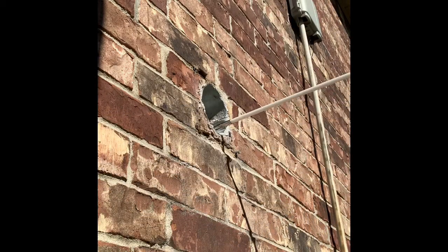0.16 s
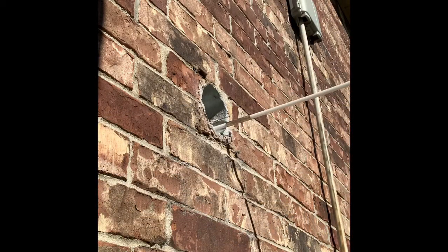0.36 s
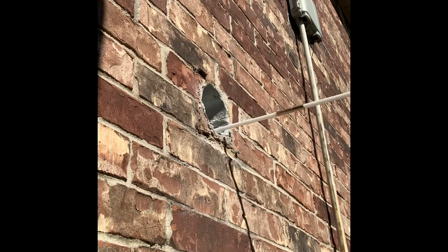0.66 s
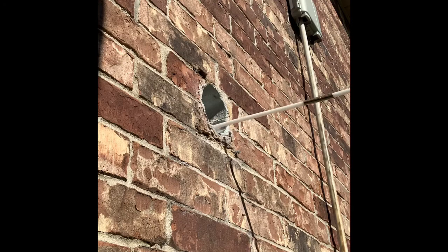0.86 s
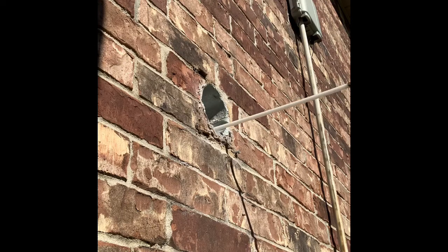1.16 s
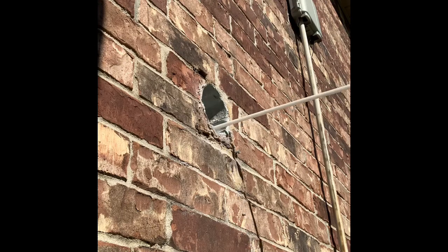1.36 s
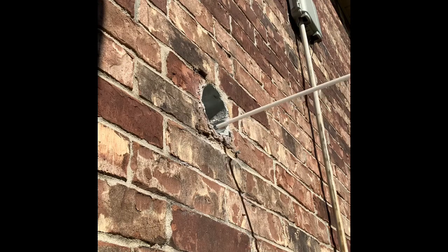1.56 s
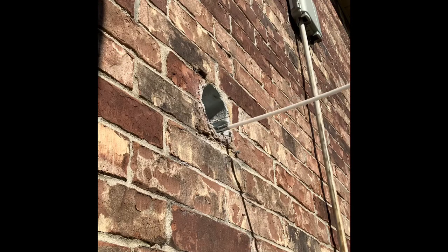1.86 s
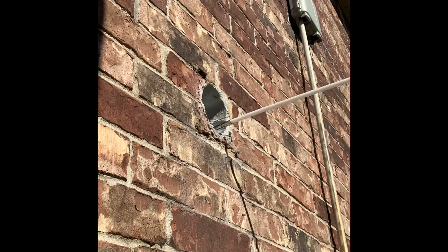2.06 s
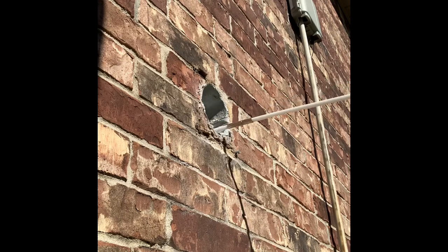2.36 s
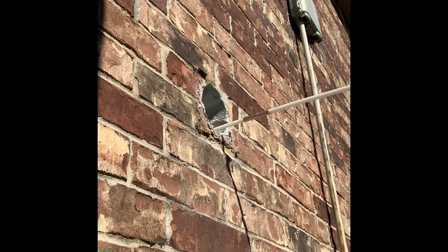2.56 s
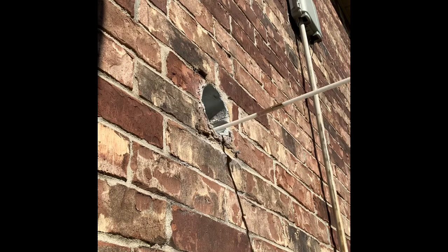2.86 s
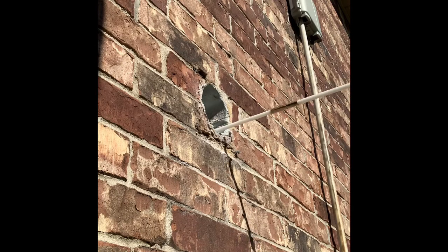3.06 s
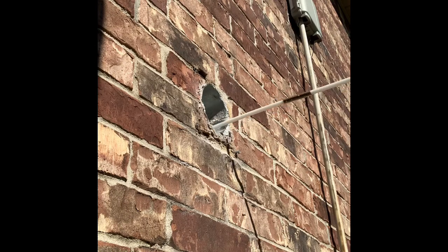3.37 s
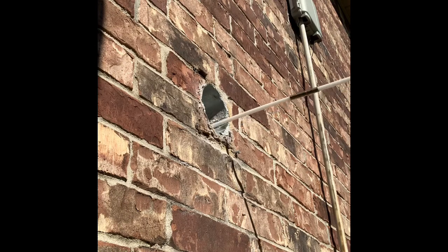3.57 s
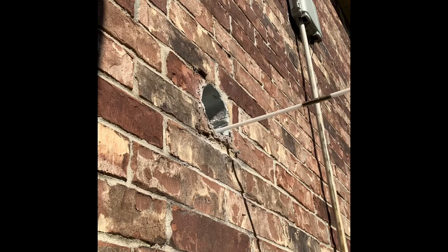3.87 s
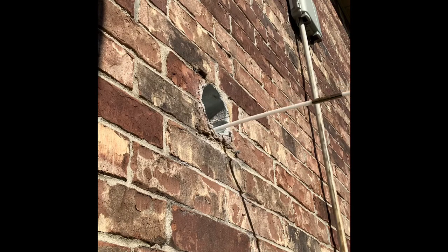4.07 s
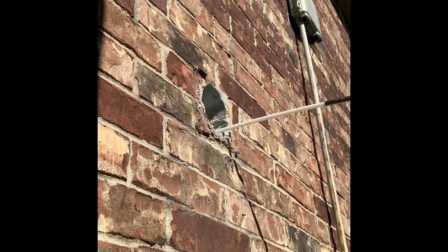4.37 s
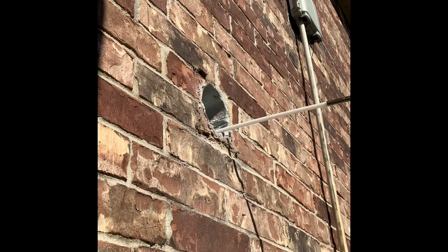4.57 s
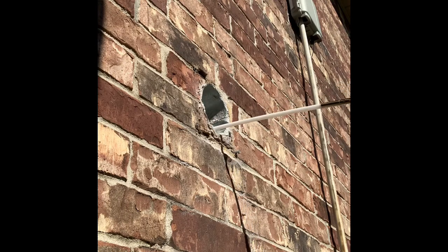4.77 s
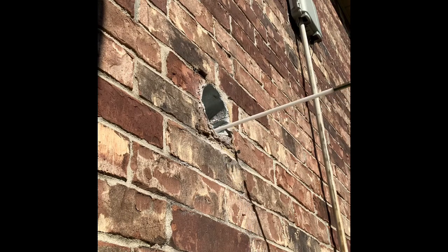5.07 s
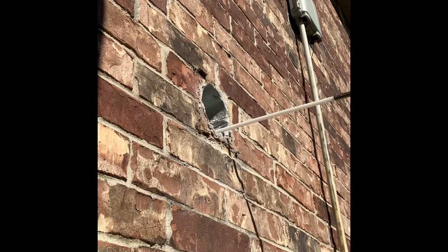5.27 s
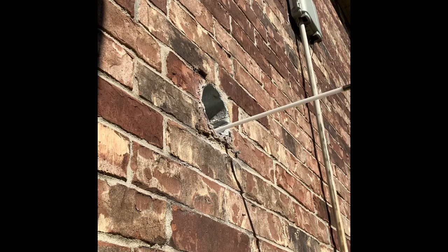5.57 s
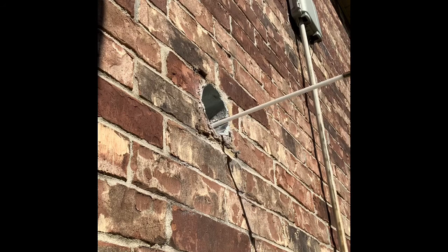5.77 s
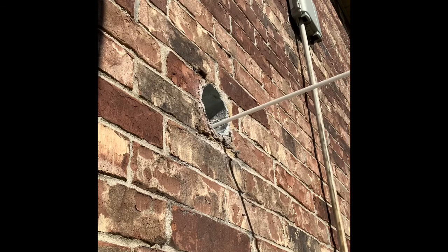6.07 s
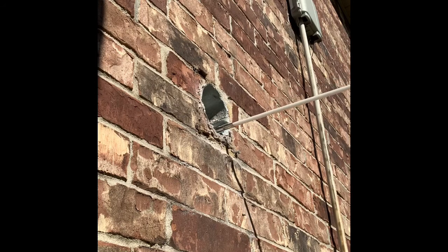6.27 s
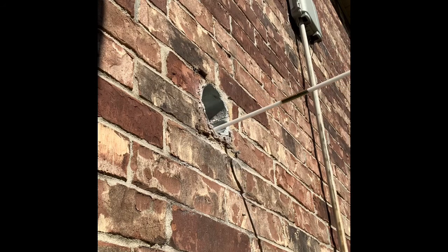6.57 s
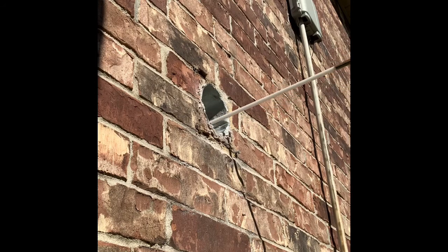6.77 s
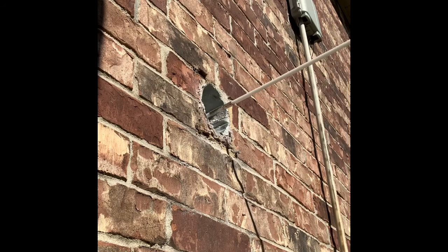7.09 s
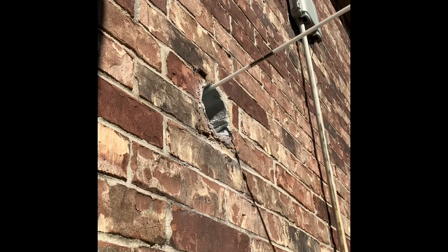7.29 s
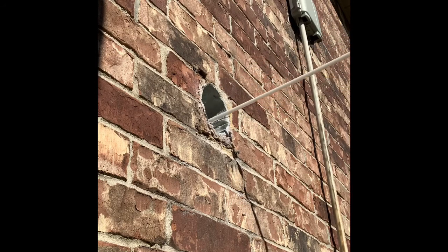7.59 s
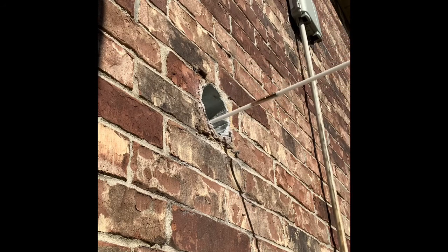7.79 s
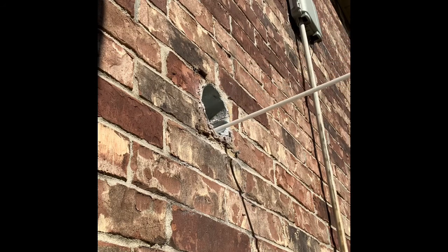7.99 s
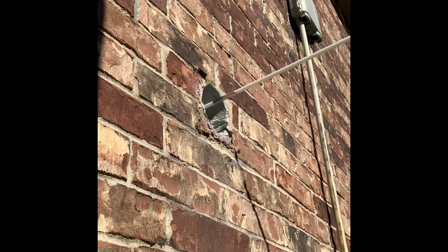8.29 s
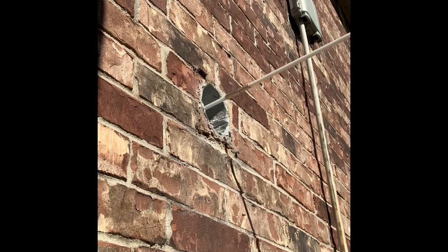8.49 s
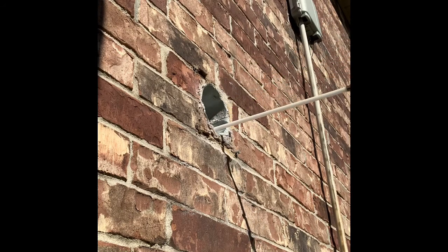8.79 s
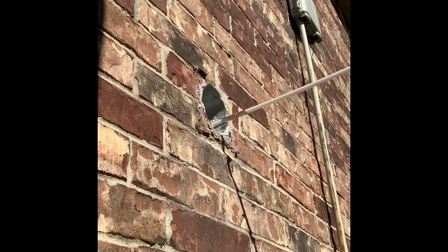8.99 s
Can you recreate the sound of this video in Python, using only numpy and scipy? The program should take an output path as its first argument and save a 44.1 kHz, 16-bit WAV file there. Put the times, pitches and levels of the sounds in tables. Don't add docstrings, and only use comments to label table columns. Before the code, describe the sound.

A loud, nasal electric drill runs first, pulsing roughly eighteen times a second, with irregular metal slaps and taps from the rod it spins in a wall duct. It slows, growls lower and chattery, then dies. A few ringing knocks follow, then an open-air hush: falling bird whistles, later buzzy trills, faint insects, low traffic, light rim scraping and small knocks. A final harder knock comes with rustling cloth. Near stereo pickup, slight brick-wall scatter.

```python
import sys
import numpy as np
from scipy import signal
from scipy.fft import rfft, irfft
from scipy.io import wavfile

SR = 44100
rng = np.random.default_rng(int(sys.argv[2]) if len(sys.argv) > 2 else 0)


def wav_out(sig):
    wavfile.write(sys.argv[1], SR, np.round(np.clip(np.atleast_2d(sig).T, -1, 1) * 32767).astype(np.int16))


def ratio_of_db(decibels):
    return 10 ** (np.asarray(decibels, float) / 20)


N = 403074
T = np.arange(N) / SR
F = np.fft.rfftfreq(N, 1 / SR) + 1


def curve(table, col):
    rows = np.array(table, float)
    return np.interp(T, rows[:, 0], rows[:, col])


def unit(x):
    return x / np.std(x)


def colour(x, points):
    hz, db = np.transpose(points)
    return irfft(rfft(x) * ratio_of_db(np.interp(np.log(F), np.log(hz), db)), N)


def noise():
    return rng.standard_normal(N)


def walk(rate_hz):
    return unit(irfft(rfft(noise()) * np.exp(-(F / rate_hz) ** 2), N))


def hump(hz, width_hz):
    return unit(irfft(rfft(noise()) * np.exp(-((F - hz) / width_hz) ** 2), N))


def flutter(phase, steady, rate_hz):
    loose = walk(rate_hz) * np.sin(phase) + walk(rate_hz) * np.cos(phase)
    return steady * np.sin(phase) + 1.08 * loose


def swells(rows):
    out = 0
    for s, rise, fall, db in rows:
        before = np.clip((s - T) / rise, 0, 9) ** 2
        after = np.clip((T - s) / fall, 0, 99)
        out = out + ratio_of_db(db) * np.exp(-before - after)
    return out


def decay(t, t60):
    return np.exp(-np.log(1000) * t / t60)


def add(out, s, x):
    i = int(s * SR)
    out[i:i + len(x)] += x[:N - i]


# (level [dB], speed slope [dB/octave], share of casing turn, steadiness, flutter [1/s])
MESH_ORDERS = [(-41, 0.5, 0.22, 2.6, 25), (-42.5, 10, -0.39, 2.12, 79), (-49.5, 5.5, 1, 0.89, 75)]
# (frequency [Hz], width [Hz], gain [dB])
CASING_MODES = [(470, 85, -4.5), (657, 71, 2.5), (909, 500, 1.5), (1060, 140, 2.5), (1500, 294, 11),
                (1800, 260, 6.5), (2196, 115, 3.5), (2603, 200, 7), (3474, 430, 17.5)]


def whine(hz, mesh, octaves, facing_db, turn):
    out = 0
    for k, (db, db_per_oct, share, steady, rate) in enumerate(MESH_ORDERS, 1):
        power = sum(ratio_of_db(2 * g) / (1 + (2 * (k * hz - f) / w) ** 2) ** 2 for f, w, g in CASING_MODES)
        level_db = db + db_per_oct * octaves + share * facing_db + 2.3 / k + 1.6 * (k - 0.76) * turn
        if k < 3:
            level_db = level_db + curve(THROB_DRIFT, 2 + k)
        line = flutter(2 * np.pi * k * mesh, steady, rate)
        out = out + np.sqrt(power) * ratio_of_db(level_db) / steady * line
    return out


# (multiple of mesh rate, level re rattle [dB], width [Hz], share of casing turn)
WEAK_ORDERS = [(.885, -23, 7, -.1), (4, -15, 150, -.3), (5, -17, 90, 0), (6, -14, 60, .6),
               (7.1, -12, 60, .1), (7.25, -11, 60, .1), (8, -11, 110, -.2)]


def weak_orders(hz, mesh, octaves, facing_db, turn, rattle_db):
    fan_hz, fan_width_hz, fan_db = 8550, 800, -12
    out = 0
    for k, db, width, share in WEAK_ORDERS:
        level_db = rattle_db + db + share * facing_db + 0.55 * turn
        level_db = level_db + (20 if k > 1 else 90) * octaves
        if k > 7:
            level_db = level_db - 0.5 + fan_db * np.minimum(((k * hz - fan_hz) / fan_width_hz) ** 2, 1)
        out = out + ratio_of_db(level_db) * flutter(2 * np.pi * k * mesh, 0.54, width)
    return out


# (frequency [Hz], width [Hz], gain [dB])
SHELL_MODES = [(1000, 94, -2.5), (1520, 140, -2), (1880, 250, -6), (2566, 550, -3), (3478, 89, 3),
               (4040, 500, 1.5), (5650, 850, -10.5), (6600, 330, -15.5), (8850, 500, -10.5)]
# (multiple of mesh rate, level [dB])
SHELL_ORDERS = [(3, -10.5), (4, -8), (5, -11.5), (6, -18.5), (7, -16)]
# (frequency [Hz], width [Hz], level [dB])
LOOSE_PARTS = [(3472, 120, -14), (4210, 220, -12.5)]


def rattle(mesh, turn, rattle_db):
    power = sum(ratio_of_db(2 * db) / (1 + ((F ** 2 - f ** 2) / (F * w)) ** 2) ** 0.78 for f, w, db in SHELL_MODES)
    shell = np.sqrt(power)
    orders = sum(ratio_of_db(db) * flutter(2 * np.pi * k * mesh, .3, 130) for k, db in SHELL_ORDERS)
    out = irfft(rfft(orders) * shell * shell, N) * ratio_of_db(rattle_db + 2.6 * turn)
    teeth = noise() * np.exp(3.8 * np.cos(2 * np.pi * mesh))
    chatter = unit(irfft(rfft(teeth) * shell, N))
    out = out + chatter * ratio_of_db(rattle_db - 6.0 + 3.6 * turn + 2.2 * walk(60))
    buzz = sum(hump(f, w) * ratio_of_db(db) for f, w, db in LOOSE_PARTS)
    return out + buzz * ratio_of_db(rattle_db + 5.15 * turn)


# (frequency [Hz], level [dB])
HISS_SPECTRUM = [(2800, -3.5), (3900, -8.5), (5000, 3.5), (5700, -0.5), (7500, -1.5), (8700, 3),
                 (10000, -1), (12000, -4), (14000, -11.5), (15800, -28.5)]


def motor_hiss(hiss_db, turn):
    hiss = unit(colour(noise(), [(50, -60.5)] + HISS_SPECTRUM))
    return hiss * ratio_of_db(hiss_db - 3.47 + 1.3 * turn + 2.54 * walk(96))


# (frequency [Hz], level [dB])
RUMBLE_SPECTRUM = [(100, -24.5), (150, -5), (200, 0), (320, -8.5), (500, -15.5), (800, -20.5),
                   (1200, -34.5)]


def rod_rumble(rumble_db, jolt_db, turn):
    rumble = unit(colour(noise(), [(20, -45.5)] + RUMBLE_SPECTRUM + [(3000, -48)]))
    return rumble * ratio_of_db(rumble_db + .5 * jolt_db + 1.5 * turn + 2.3 * walk(7.2))


# (time [s], rise [s], fall [s], level [dB])
ROD_WHIPS = [(.4, 0.077, 0.072, -12), (1.2, 0.25, 0.22, -4), (1.65, 0.084, 0.11, -1), (2.2, 0.43, 0.17, -8),
             (3.2, 0.32, 0.077, -2), (4.32, 0.015, 0.035, 5.5)]
# (time [s], rise [s], fall [s], level [dB])
AIR_DRONES = [(.1, 0.084, .1, -34.5), (1.5, 0.034, 0.17, -32.5), (2.3, 0.08, .06, -34)]


def duct_boom(hz):
    whip_hz, whip_width_hz = 603, 57
    speed_db = 4 * np.exp(-((hz - whip_hz) / whip_width_hz) ** 2)
    boom_db = -46 + speed_db + 20 * np.log10(1 + swells(ROD_WHIPS)) + 1.0 * walk(3.3)
    return hump(106, 38.5) * ratio_of_db(boom_db + 3.0) + hump(200, 60) * swells(AIR_DRONES)


# (time [s], gear mesh [Hz], motor effort [dB], casing turned to the phone [dB], rod pressed on duct [dB])
HAND_ON_DRILL = [(0, 1079, -34, -8, -36), (.33, 1074, -31, -11, -40.5), (.55, 1079, -34, -2, -41),
                 (.64, 1142, -32, -14, -41), (1.0, 1159, -33, -10, -40.5), (1.25, 1179, -32, -3, -46.5),
                 (1.45, 1146, -31.5, -5, -34.5), (1.8, 1119, -31, 4.5, -37), (2.1, 1065, -32, 4, -32.5),
                 (2.3, 1059, -36, -1, -33), (2.54, 847, -32.5, 7, -44), (2.68, 753.8, -37.5, 2.5, -44),
                 (3.06, 636.7, -37, -3, -44.5), (3.5, 631.6, -42, -12, -49),
                 (3.88, 641.3, -41.5, 4.5, -42.5), (4.05, 486.5, -53, -8.5, -46),
                 (4.24, 420.2, -56, -1, -49), (4.3, 332.6, -62, 4, -48.5)]
# (time [s], throb lag [turns], throb depth, first
# order [dB], second order [dB])
THROB_DRIFT = [(.1, -0.36, 1.5, 1, 4.5), (.55, -0.17, 1.25, 3.5, 5), (.85, -0.39, 0.97, 0.5, 1.5),
               (1.2, -0.19, 1.86, 1, 1.5), (1.6, -0.55, 0.95, -7, -0.5), (1.85, -0.57, 1.02, 3, 5),
               (2.2, -0.55, 1.8, -0.5, 2.5), (2.45, -0.56, 0.46, 1.5, 3.5), (2.62, -0.57, 0.53, -11.5, 4),
               (2.84, -0.57, 0.53, -4, 4.5), (3.02, -0.64, 0.93, -8, 2), (3.3, -0.85, 1.6, 2.5, 6),
               (3.48, -0.86, 1.2, 3.5, 4.5), (3.62, -0.57, 1.4, -11.5, 2), (3.75, -0.82, 1.6, -14.5, 1.5),
               (3.88, -0.72, 1.8, 2.5, 9), (4.1, -0.89, 0.14, 0.5, 3.5), (4.3, -1, 0.81, -4, 4.5)]


def drill():
    teeth_per_turn, strike_s, slip_turns = 60.5, 3.514, .02
    jolt_s, jolt_lag_s = 0.03, 0.0086
    hz, effort_db, facing_db, rumble_db = (curve(HAND_ON_DRILL, c) for c in range(1, 5))
    octaves = np.log2(hz / 1100)
    mesh = np.cumsum(hz * (1 + .0015 * walk(20.2))) / SR
    turns = (mesh - np.interp(strike_s, T, mesh)) / teeth_per_turn
    angle = 2 * np.pi * (turns + slip_turns * walk(7.1) + curve(THROB_DRIFT, 1))
    turn = np.cos(angle) * curve(THROB_DRIFT, 2)
    mesh = mesh + 0.058 * np.sin(angle)
    jolt_db = sum(db * np.exp(-((T - s - jolt_lag_s) / jolt_s) ** 2) for s, _, _, db in ROD_SLAPS)
    rattle_db = -33 + 0.99 * (effort_db + 32.5) - 10.5 * octaves + 0.91 * jolt_db
    out = whine(hz, mesh, octaves, facing_db, turn)
    out = out + weak_orders(hz, mesh, octaves, facing_db, turn, rattle_db)
    out = out + rattle(mesh, turn, rattle_db)
    out = out + motor_hiss(effort_db + jolt_db, turn)
    out = out + rod_rumble(rumble_db, jolt_db, turn)
    out = out + duct_boom(hz)
    running = np.clip((4.43 - T) / .07, 0, 1)
    return out * running


# (frequency [Hz], level [dB], t60 [s])
DUCT_MODES = [(1540, -7, .07), (1860, 0, .2), (2320, -14, .06), (2923, -10, .05), (3413, -14, .05),
              (5780, -18, .04), (7400, -22, .04)]


def knock(hz, crack, ring, thud, chance):
    thud_hz, near_oct = 400, 0.21
    t = T[:SR // 4]

    def band(order, low_hz, high_hz, x):
        return signal.sosfilt(signal.butter(order, [low_hz, high_hz], "band", fs=SR, output="sos"), x)

    burst = chance[:len(t)] * (decay(t, .03) + .06 * decay(t, .3)) * np.minimum(t / .0012, 1)
    body = band(3, 0.74 * hz, 1.6 * hz, burst)
    top = band(3, 3200, 9500, burst * decay(t, 0.033))
    ping = np.sin(2 * np.pi * hz * t) * decay(t, 0.033) * np.minimum(t / 0.0024, 1)
    body = body + ratio_of_db(2.5) / 3.9 * ping
    modes = 0
    for (f, db, t60), c in zip(DUCT_MODES, chance[-9:]):
        far = min(abs(np.log2(f / hz)) / near_oct, 1)
        modes = modes + ratio_of_db(db + 2.5 * c - far * 8) * np.sin(2 * np.pi * f * t) * decay(t, t60)
    low = band(2, 0.42 * thud_hz, 1.4 * thud_hz, 9 * chance[10:] * decay(t, .045))
    return crack[0] * body * 1.46 + crack[1] * top * 2.4 + ring * modes + thud * low


def chances(table):
    return rng.standard_normal((len(table), SR // 4 + 10))


# (time [s], level [dB], ring re slap [dB], jolt [dB])
ROD_SLAPS = [(0.0365, -19, -0.5, 0.5), (0.0986, -26, -6.5, 4.5), (0.384, -18, -30, -1),
             (0.445, -13.5, -46, 1), (0.518, -17, -10.5, 1.5), (0.563, -15, -21.5, 2.5),
             (0.628, -14, -24, 0.5), (0.8905, -16, -9, -0.5), (0.9619, -20, -37.5, 2.5),
             (1.0128, -12.5, -27, 0), (1.05, -17, -19, -1.5), (1.228, -23, -28, 0.5),
             (1.4078, -24, 9.5, 2.5), (1.474, -21, -39, 0), (2.146, -17.5, -7.5, 1.5), (2.316, -18, -29, 4),
             (2.368, -33, -20, 4.5), (2.52, -18, 3, -4), (2.7345, -27, -10, 3.5), (2.862, -31, -6, 3),
             (3.212, -19, 4, -2.5), (3.323, -13, -19, -1), (3.414, -19.5, -9, -6), (3.5138, -27, -7, 5.5),
             (3.601, -17, -15, 5), (3.716, -20, 17.5, 8), (3.877, -17, -40, -2), (3.9734, -18, -47, -4.5),
             (4.0646, -23.5, 10, 0.5), (4.173, -31, 17, 5.5)]


def slaps():
    out = np.zeros(N)
    for (s, db, ring_db, _), c in zip(ROD_SLAPS, chances(ROD_SLAPS)):
        ring_db = ring_db - 25 * (s > 2.25)
        crack = (ratio_of_db(ring_db + 8.5), .9)
        add(out, s, ratio_of_db(db - 6.0) * knock(1750 + 150 * c[-10], crack, ratio_of_db(ring_db - 10), 0, c))
    return out


# (time [s], level [dB], pitch [Hz])
RIM_TAPS = [(0.037, -47.5, 1870), (0.037, -44, 1560), (0.0994, -36.5, 1820), (0.099, -34.5, 1520),
            (0.326, -45, 1850), (.519, -41, 1500), (0.519, -37, 1860), (0.892, -29.5, 2000),
            (0.632, -35, 1820), (.674, -41.5, 1900), (.731, -39, 1880), (.845, -36, 1850),
            (1.013, -39, 1560), (1.051, -31, 1970), (1.109, -36.5, 1930), (1.152, -42, 1870),
            (1.23, -30.5, 1980), (1.368, -36, 1940), (1.408, -38, 1600), (1.476, -40, 1920),
            (1.541, -53.5, 1900), (1.58, -52.5, 1900), (1.644, -52.5, 1850), (1.74, -40.5, 1830),
            (1.889, -38, 1860), (1.962, -50, 1610), (2.082, -37.5, 1800), (2.235, -37.5, 1800),
            (2.374, -35, 1430), (2.425, -30.5, 1460), (2.821, -40, 1920), (2.927, -30, 1590),
            (3.29, -31, 1500), (3.4, -30, 2000), (3.486, -33, 1500), (3.68, -29, 1906), (3.715, -39, 1830),
            (3.859, -40, 2400), (4.064, -54, 1850), (4.065, -42, 945), (4.118, -39, 1730),
            (4.177, -40, 1800), (4.18, -45, 885), (4.24, -39, 1630), (4.299, -45, 1000), (4.33, -48, 960),
            (4.35, -50, 1640)]


def taps():
    out = np.zeros(N)
    for (s, db, hz), c in zip(RIM_TAPS, chances(RIM_TAPS)):
        slow_db = -1 * (s > 2.3)
        add(out, s, ratio_of_db(db + 13.5 + slow_db) * knock(hz, (.9, 0), ratio_of_db(-17.5), 0, c))
    return out


# (time [s], level [dB], pitch [Hz], t60 [s])
METAL_SNAPS = [(0.0373, -14, 1900, .018), (.038, -20, 8160, 0.0088), (.1, -16, 1900, 0.022),
               (0.101, -25, 8800, .008), (0.1022, -23, 1750, 0.014), (.384, -20, 8100, .01),
               (0.445, -24, 8200, .01), (.564, -24, 8300, .01), (1.4083, -20, 1560, .02),
               (1.408, -26, 7120, .006), (6.1985, -36.5, 5560, .014), (6.2, -53, 8400, .008),
               (6.211, -61, 5300, 0.026), (7.5572, -36.5, 1436, .022), (8.781, -45, 2570, 0.053),
               (8.782, -45, 1900, 0.092), (8.868, -44, 5650, .03), (8.914, -45, 5500, .06),
               (5.689, -62, 1500, 0.018), (6.857, -67, 2100, .02), (8.579, -60, 2035, .02),
               (4.3935, -41, 1900, .03), (4.394, -37, 2600, .08), (4.394, -38, 5650, .04),
               (4.42, -40, 2550, .1), (5.1512, -29.5, 1880, 0.023), (7.2222, -36, 2800, 0.014),
               (7.224, -49, 6320, 0.046), (7.228, -47.5, 600, 0.11), (8.6954, -26, 3450, 0.015),
               (8.6946, -25, 1950, 0.027), (8.696, -36, 2800, .03), (8.7011, -32, 450, 0.021),
               (8.7072, -28.5, 414, 0.061)]


def snaps():
    out, t = np.zeros(N), T[:SR // 10]
    for s, db, hz, t60 in METAL_SNAPS:
        ping = np.sin(2 * np.pi * hz * t) * decay(t, t60) * np.minimum(t / .0005, 1)
        add(out, s, ratio_of_db(db) * ping)
    return out


# (start [s], length [s], from [Hz], to [Hz], level [dB])
WHISTLE_NOTES = [(-.047, .05, 2200, 2090, -12), (0, .034, 3580, 3440, -8), (.02, .085, 3440, 2640, 0),
                 (.005, .035, 7000, 6950, -21), (.105, .045, 3450, 3440, -14), (-.04, .04, 3280, 3250, -19)]
# (time [s], level [dB])
WHISTLES = [(4.322, -49.5), (4.577, -48), (5.34, -50), (5.599, -48), (5.864, -47)]


def whistles():
    song = np.zeros(N)
    for s, db in WHISTLES:
        for start, length, from_hz, to_hz, note_db in WHISTLE_NOTES:
            u = np.arange(int(length * SR)) / (length * SR)
            hz = to_hz + (from_hz - to_hz) * (1 - u) ** 1.05
            shape = np.sin(np.pi * u ** 3.0) ** 0.31
            add(song, s + start, ratio_of_db(db + note_db) * shape * np.sin(2 * np.pi * np.cumsum(hz) / SR))
    return song


# (time [s], length [s], pitch [Hz], level [dB])
BUZZY_TRILLS = [(6.572, 0.054, 2310, -75), (6.685, 0.076, 2690, -70), (6.894, 0.096, 2290, -78),
                (6.99, 0.14, 2710, -74.5), (7.206, 0.12, 2225, -63), (7.369, 0.1, 2046, -62),
                (7.549, 0.15, 2123, -62.5), (7.684, 0.059, 2860, -67), (7.74, 0.15, 2100, -63),
                (7.941, 0.14, 2067, -61), (8.151, 0.09, 2073, -62.5), (8.327, 0.14, 2070, -63)]


def trills():
    buzz = np.zeros(N)
    for s, length, hz, db in BUZZY_TRILLS:
        t = T[:int(length * SR)]
        beat = 2 * np.pi * 42 * t + np.cumsum(0.03 * rng.standard_normal(len(t)))
        sag = .05 * np.sin(np.pi * (.25 + .7 * t / length))
        pitch = hz * (.97 + .035 * np.sin(beat) + sag)
        shape = np.sin(np.pi * t / length) ** 0.13 * (1 - .38 * np.cos(beat))
        add(buzz, s, ratio_of_db(db) * shape * np.sin(2 * np.pi * np.cumsum(pitch) / SR))
    return buzz


def birds():
    song, buzz = whistles(), trills()
    tail = rng.standard_normal(SR // 2) * np.exp(-T[:SR // 2] / .09)
    echo = signal.fftconvolve(song + .4 * buzz, tail)[:N]
    echo = colour(echo, [(2100, -3), (2700, -4), (3600, -1), (7000, -14)])
    return song * ratio_of_db(4 * walk(110)) + buzz * (0.71 + 0.5 * walk(150)) + ratio_of_db(-35.0) * echo


# (time [s], level [dB], crack [Hz], treble re crack [dB], duct ring re crack [dB])
ROD_KNOCKS = [(4.394, -37.5, 1500, -6.5, -15), (4.4197, -35.5, 1937, -8.5, -12.5),
              (4.4404, -47, 1460, -8, 2), (5.069, -41, 1800, -15, -20), (5.152, -35.5, 1875, -8, -18.5),
              (5.3988, -55.5, 1420, -15, -26), (5.6898, -69, 1520, -9, -16), (5.7624, -56, 923, -17, -25),
              (5.841, -46.5, 1850, -26, -24), (5.934, -61, 2180, -7, -33), (6.199, -61, 5740, -16, -14),
              (6.206, -49, 910, -34, -26), (6.856, -77, 2100, -4, -18), (7.223, -39.5, 2820, -20, -24),
              (7.227, -45, 1950, -20, -14), (7.559, -52, 1390, -34, -40), (7.559, -50, 980, -28, -42),
              (7.8053, -55, 1670, -19, -22), (8.242, -61, 2200, -12, -27.5), (8.579, -62, 1990, -4.5, -27),
              (8.695, -28.5, 1800, -14, -30), (8.697, -37.5, 3340, -22, -40), (8.698, -49, 1260, -32, -40),
              (8.7078, -38, 920, -30, -48), (8.7818, -52, 2240, -10, -16), (8.8665, -48, 1440, -21, -19),
              (8.914, -51, 1700, -14, -20)]


def knocks():
    hand_s, hand_db = 8.6, 5.5
    out = np.zeros(N)
    for (s, db, hz, top_db, ring_db), c in zip(ROD_KNOCKS, chances(ROD_KNOCKS)):
        thud_db = -48 + 0.3 * (db + 54.0) - db + hand_db * (s > hand_s) * (db + 72.5) / 25
        blow = knock(hz, (.9, ratio_of_db(top_db)), ratio_of_db(ring_db), ratio_of_db(thud_db - 15.0), c)
        add(out, s, ratio_of_db(db + 9.0) * blow)
    return out


# (time [s], rise [s], fall [s], level [dB])
RIM_DRAGS = [(4.5, 0.017, 0.84, -65.5), (5.3, 0.17, 0.17, -68), (6.05, 0.37, 0.24, -66),
             (7.8, 0.3, 0.26, -66), (8.5, 0.2, 0.5, -84)]


def rim():
    out = hump(1700, 690) * swells(RIM_DRAGS) * ratio_of_db(3.5 * walk(25) - 8.5) * (T > 4.45)
    t = T[:SR // 3]
    wall = np.sin(2 * np.pi * 1858 * t) * np.exp(-t / .045)
    wall = wall + .6 * np.sin(2 * np.pi * 1535 * t) * np.exp(-t / .016)
    for s, db, _, _, ring_db in ROD_KNOCKS:
        add(out, s, ratio_of_db(db + ring_db + 4) * wall)
    return out


# (frequency [Hz], density [dB/Hz])
TOWN_SPECTRUM = [(25, -94), (45, -71), (65, -65), (100, -65.5), (150, -75), (320, -86), (700, -93.5),
                 (900, -101), (1150, -113), (1900, -117), (3800, -118), (7500, -122), (10000, -117),
                 (12500, -128), (15800, -134)]
# (time [s], rise [s], fall [s], level [dB])
FAR_FLOCK = [(4.65, 0.16, 0.48, -62), (5.7, 0.26, 0.82, -65.5), (7.3, 0.11, 0.86, -72.5),
             (8.6, .1, .15, -85)]


def outdoors():
    town = colour(noise(), TOWN_SPECTRUM) * np.sqrt(SR / 2) * ratio_of_db(0.11 * walk(4.5))
    insects = hump(5500, 890) * ratio_of_db(-69.5 + 1.1 * walk(2.4))
    chatter = sum(hump(hz, 230) * ratio_of_db(3.0 * walk(21)) for hz in (2600, 3000, 3500))
    return town + insects + chatter * swells(FAR_FLOCK) * ratio_of_db(-9.0)


# (frequency [Hz], level [dB])
CLOTH_SPECTRUM = [(500, -7), (1800, 3.5), (2700, -5), (3700, 2), (4500, 0), (5700, 3), (7000, -2.5),
                  (9500, 5), (12000, -6), (14000, 0.5)]
# (time [s], rise [s], fall [s], level [dB])
CLOTH_RUBS = [(6.21, 0.0071, 0.018, -67), (6.28, 0.046, 0.042, -73.5), (7.23, 0.0034, 0.032, -70),
              (7.96, 0.06, 0.011, -72.5), (8.34, 0.014, 0.011, -69.5), (8.46, 0.065, 0.017, -64),
              (8.49, 0.0065, 0.0069, -58), (8.6, 0.088, 0.12, -66), (8.698, 0.003, 0.0036, -39.5),
              (8.76, 0.085, 0.28, -60.5), (8.93, 0.03, 0.1, -68), (9.1, 0.018, 0.091, -72.5)]


def rustle():
    cloth = unit(colour(noise(), [(100, -40)] + CLOTH_SPECTRUM))
    return cloth * swells(CLOTH_RUBS) * ratio_of_db(7.0 + 1.8 * walk(48))


def scene():
    tool = drill()
    wall = rim()
    rest = slaps() + taps() + snaps() + birds() + knocks() + outdoors() + rustle()
    detour = 2 * np.pi * np.clip((F - 570) / 450, 0, 1)
    tool_left = irfft(rfft(tool) * np.exp(-1j * detour), N)
    near = np.array([tool_left, tool]) + rest + wall
    scatter = rng.standard_normal((2, 2000)) * np.exp(-T[:2000] / 0.02)
    scatter = scatter[0] * np.array([[1], [-1]]) + .35 * scatter[1]
    rough = colour(tool + rest, [(300, -22), (750, 1), (1100, -4), (1450, 1.5), (2000, -3.5), (3200, -6),
                                 (4150, -10.5), (4650, -17.5), (5500, -8.5), (7000, -12), (8300, -24),
                                 (11000, -10.5), (15000, -17.5)])
    return near + ratio_of_db(-29) * signal.fftconvolve(rough[None], scatter, axes=1)[:, :N]


def band_limit(x):
    return signal.sosfilt(signal.butter(12, 16770, fs=SR, output="sos"), x)


def record(dry):
    lag_samples, lead_rad, top_hz = 5.3, .3, 15800
    lag = 2 * np.pi * F * lag_samples / SR - lead_rad * np.minimum(F / 4000, 1)
    left = irfft(rfft(dry[0]) * np.exp(-1j * lag), N)
    left = colour(left, [(40, 0.97), (200, 0.58), (400, 2.6), (750, 0.024)])
    right = colour(dry[1], [(40, 0.0), (200, -2.5), (400, -3.5), (750, 0.87)])
    cut = signal.ellip(8, .2, 70, top_hz, fs=SR, output="sos")
    mix = signal.sosfilt(cut, np.array([left, right]))
    return band_limit(mix)


dry = scene()
out = record(dry)
wav_out(out)
```